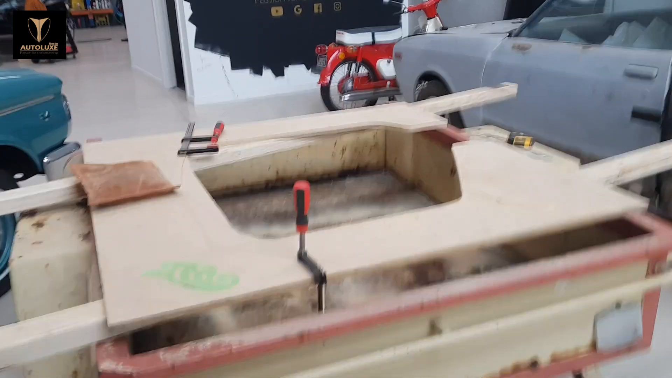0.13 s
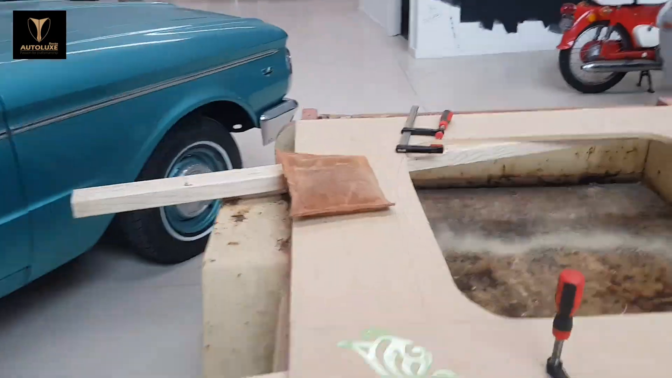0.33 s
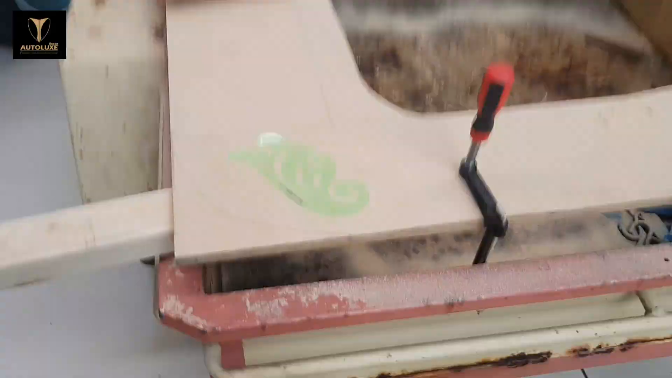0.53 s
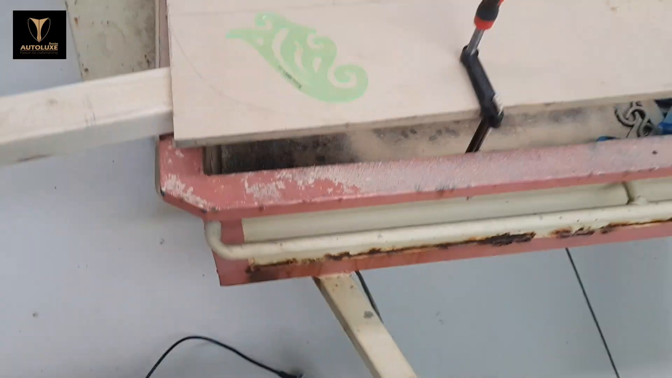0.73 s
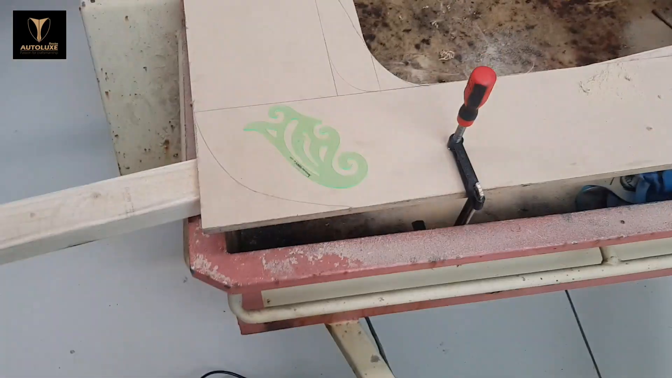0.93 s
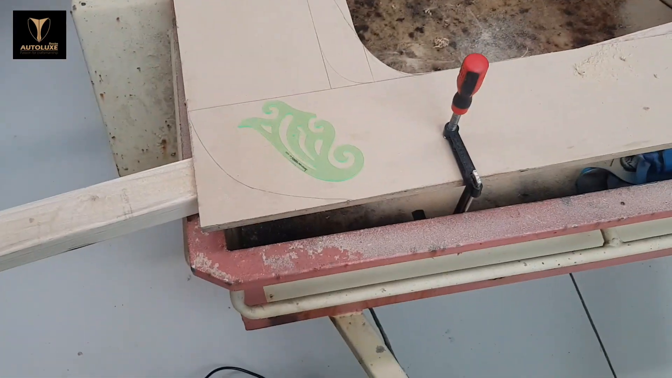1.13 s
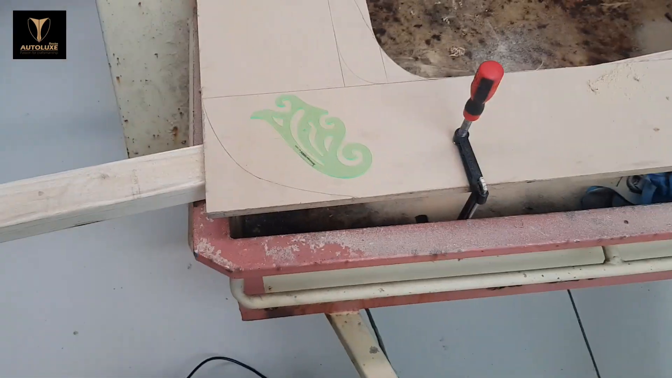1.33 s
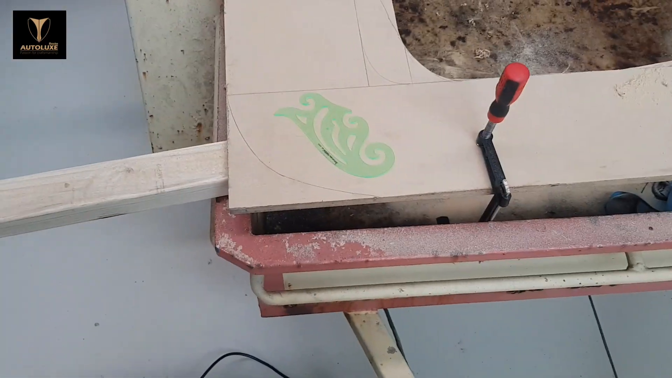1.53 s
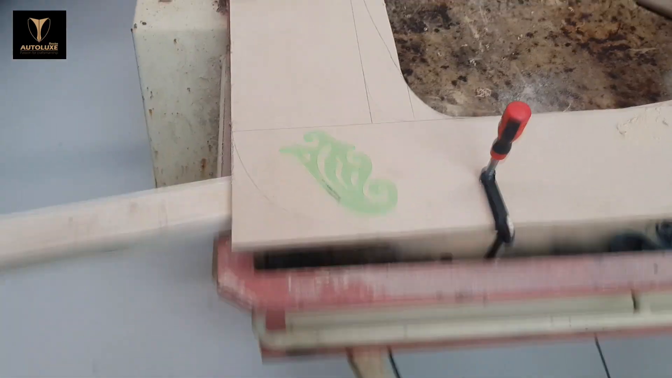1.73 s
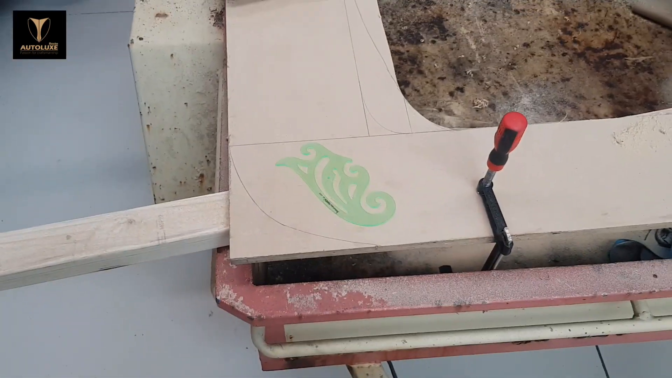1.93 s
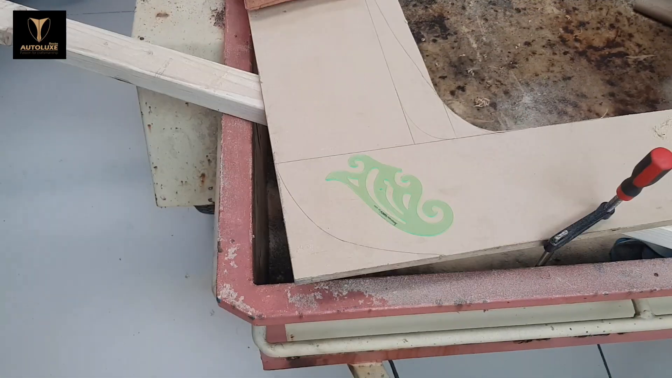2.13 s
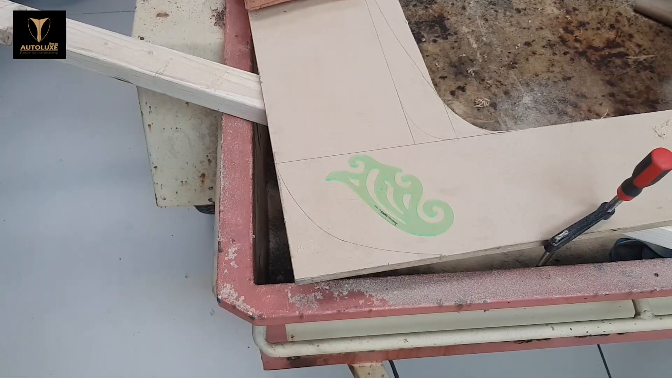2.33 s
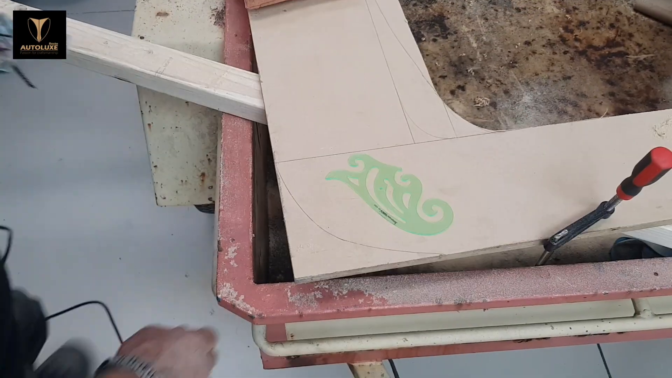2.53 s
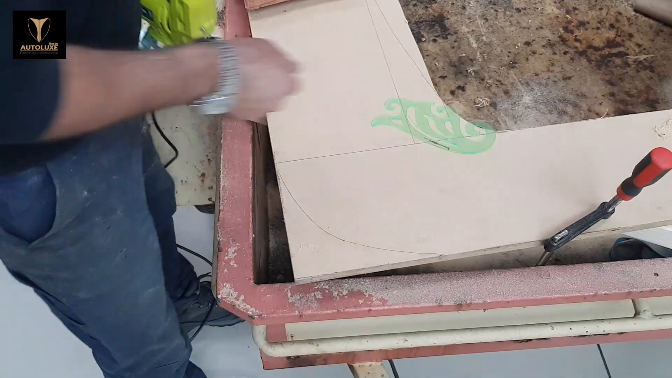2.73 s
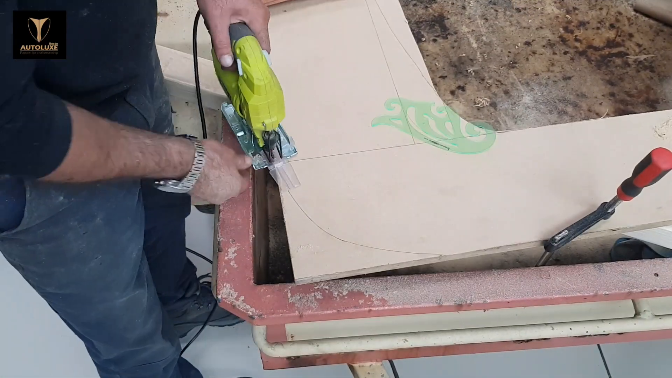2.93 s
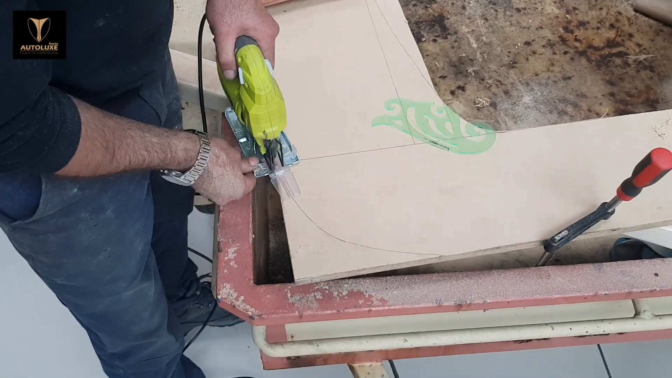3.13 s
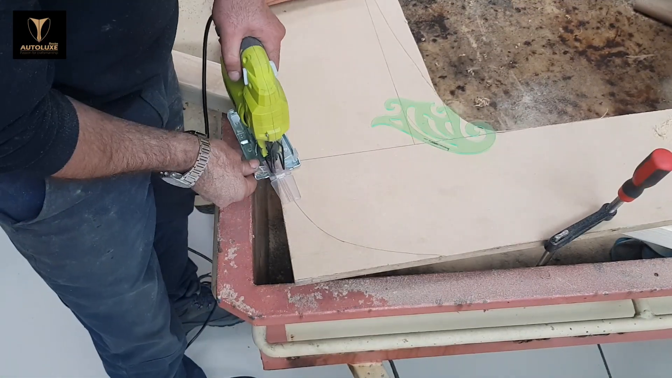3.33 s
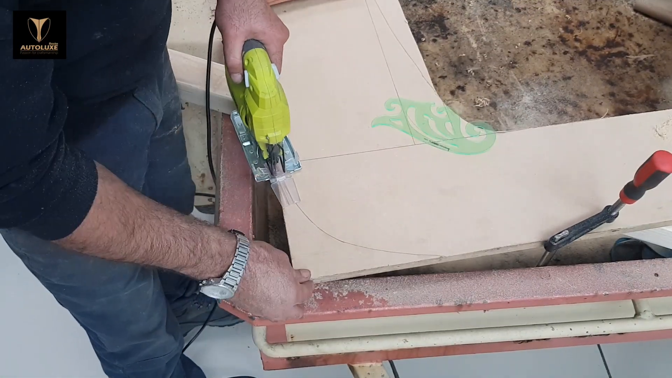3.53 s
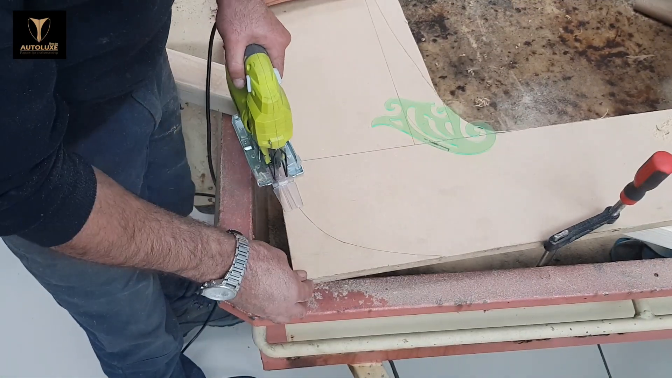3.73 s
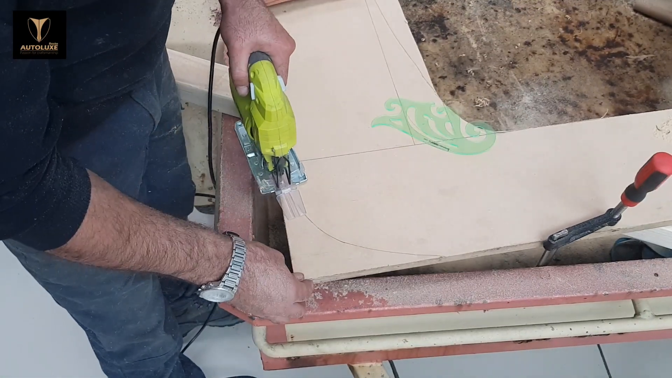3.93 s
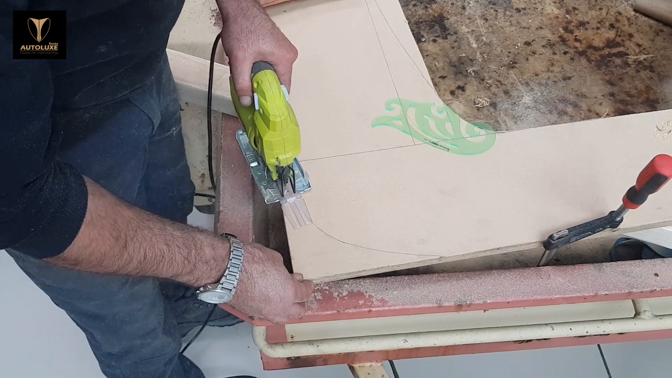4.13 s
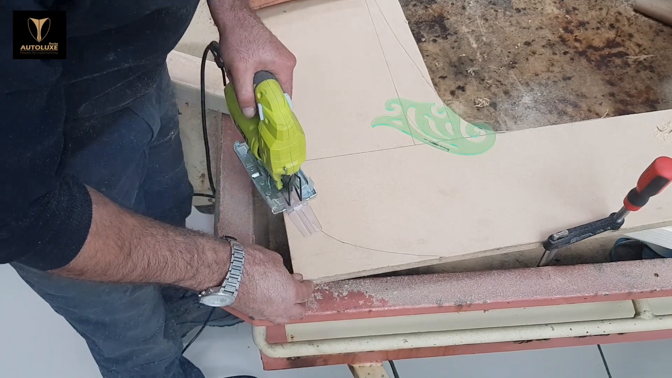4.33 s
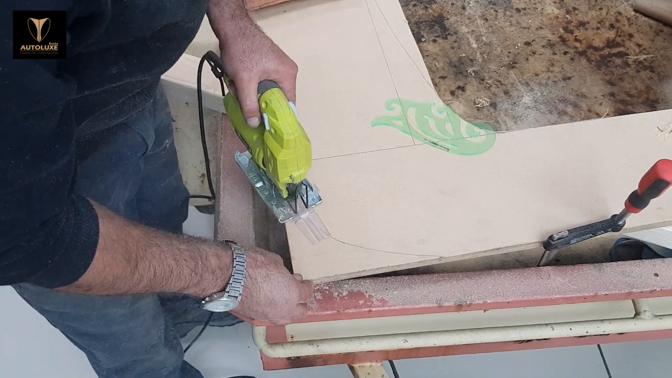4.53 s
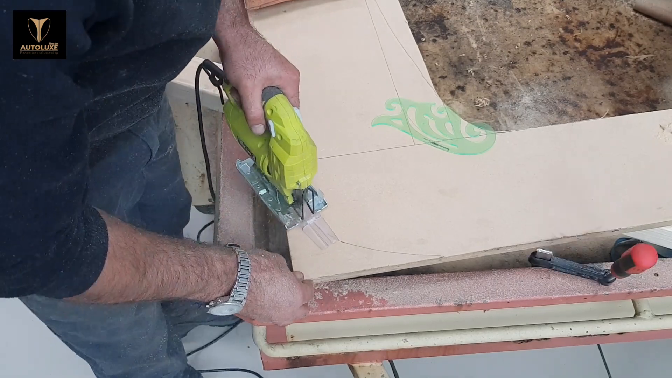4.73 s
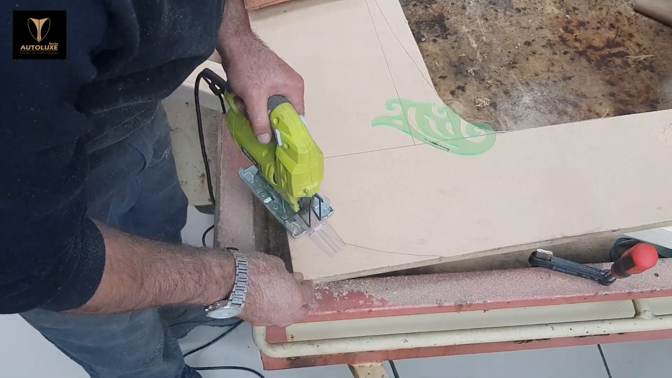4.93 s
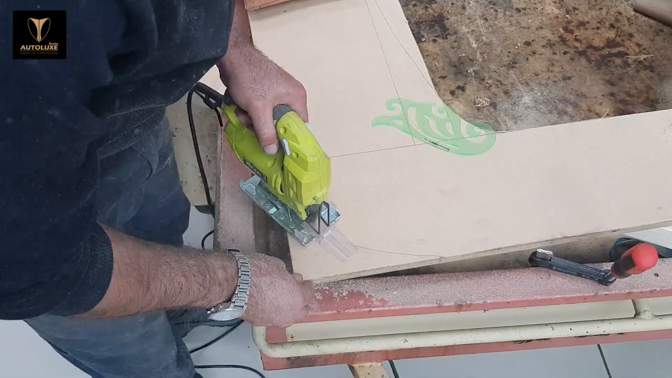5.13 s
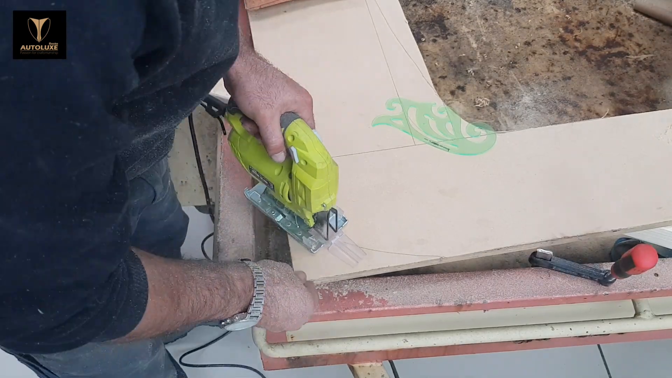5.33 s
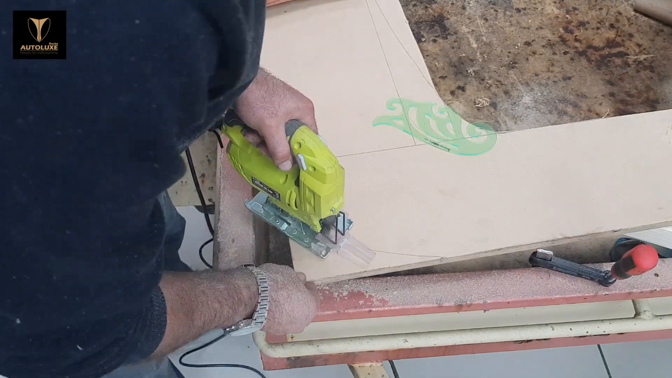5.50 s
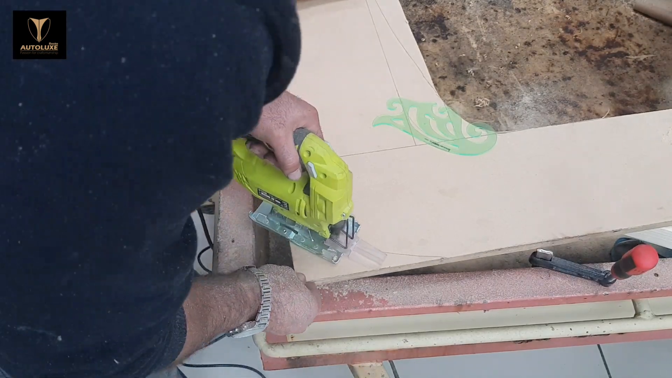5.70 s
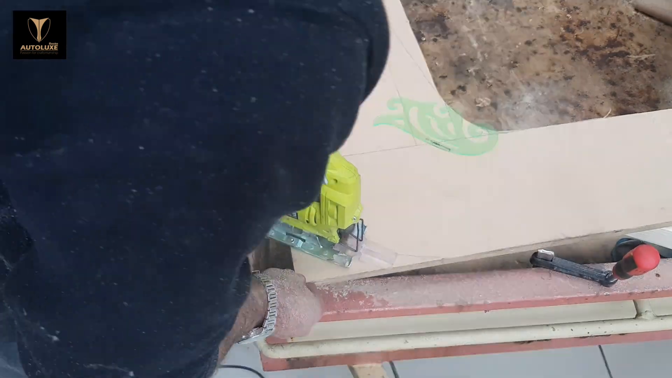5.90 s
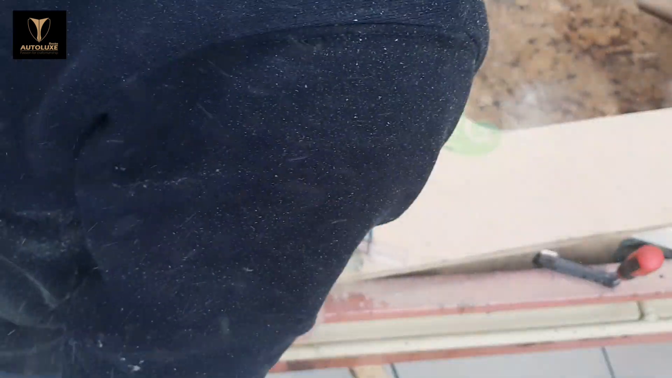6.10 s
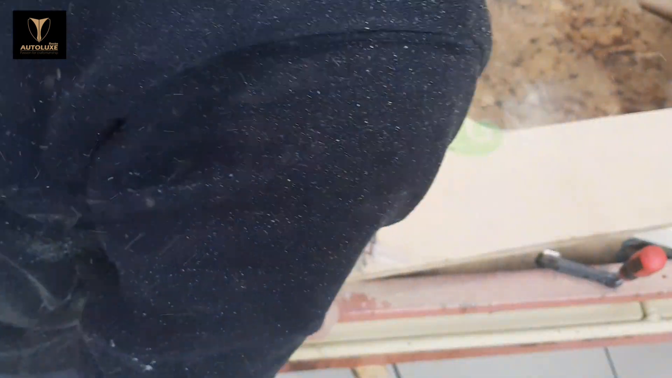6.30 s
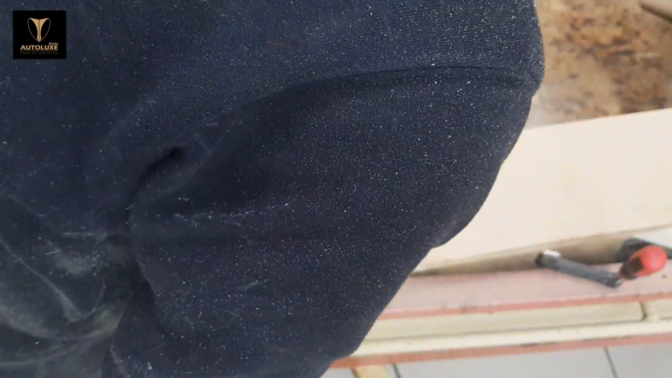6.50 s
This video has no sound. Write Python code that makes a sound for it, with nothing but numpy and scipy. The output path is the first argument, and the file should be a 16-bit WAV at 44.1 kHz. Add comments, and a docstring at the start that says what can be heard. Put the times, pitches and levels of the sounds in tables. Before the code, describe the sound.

Light wooden knocks, scrapes and shoe scuffs in a quiet workshop, then an electric jigsaw snaps on and buzzes harshly through a board.

```python
"""An electric jigsaw cuts a wooden board on a steel frame in a workshop, at about 52 strokes a second.
Its partials, set at multiples of the stroke rate, shake the board; noise pulsed by the stroke is the rasp.
Motor, gears and fan run on; pushed, the saw slows and the board sings; eased off, it speeds up.
Before the cut, knocks ring the board's decaying modes, and it shifts in friction noise as shoes scuff the
floor over low room noise. During the cut a clamp shakes loose and falls with thumps and a click."""
import sys
import numpy as np
from scipy import signal
from scipy.fft import rfft, irfft, next_fast_len
from scipy.io import wavfile
from scipy.ndimage import map_coordinates

SR = 44100
rng = np.random.default_rng(int(sys.argv[2]) if len(sys.argv) > 2 else 0)


def generate_wav(signal):
    """Clip the signal to [-1, 1] and save it as 16-bit WAV at the path in sys.argv[1]."""
    frames = np.transpose(np.atleast_2d(signal))
    scaled = np.clip(frames, -1, 1) * 32767
    pcm = np.round(scaled).astype(np.int16)
    wavfile.write(sys.argv[1], SR, pcm)


N = 289296
SAW_ON = 3.092  # s

# coherence of the left and right sound: (frequency [Hz], likeness [-1 to 1])
LIKENESS = [(30, 0.31), (100, 0.99), (300, 0.91), (600, 0.76), (1000, 0.59), (2000, 0.41), (4000, 0.24),
            (8000, 0.53), (14000, 0.064)]
# the board jumps as the saw starts, as a clamp shakes loose and falls, and as the blade bites again:
# (time [s], relative level [dB])
JOLTS = [(3.092, -32), (4.662, -28), (4.673, -25), (4.679, -18), (4.693, -26), (4.715, -32), (6.345, -36),
         (6.359, -28), (6.378, -33)]


def amp(db):
    """Converts a level in decibels to an amplitude ratio."""
    return 10 ** (np.asarray(db) / 20)


def unit(x):
    """Normalises the root mean square to 1."""
    return x / np.sqrt(np.mean(x ** 2) + 1e-20)


def clock():
    """Sampling instants in seconds."""
    return np.arange(N) / SR


def along(points, hz):
    """Interpolates (frequency [Hz], value) points on a logarithmic frequency axis."""
    f, v = np.transpose(points)
    return np.interp(np.log(hz + 1), np.log(f + 1), v)


def curves(rows):
    """Linear interpolation in time: one value per sample for each column after the time."""
    s, *cols = np.transpose(rows)
    return [np.interp(clock(), s, c) for c in cols]


def wobble(rate):
    """A smooth random modulation: a spline through Gaussian knots, rate of them a second."""
    knots = rng.standard_normal(int(N * rate / SR) + 4)
    coarse = np.arange(0, N + 32, 32)
    smooth = map_coordinates(knots, [coarse * rate / SR])
    return np.interp(np.arange(N), coarse, smooth)


def filtered(x, response):
    """Linear filtering: the spectrum times a response given as a function of frequency."""
    m = next_fast_len(N + SR // 4)
    hz = np.fft.rfftfreq(m, 1 / SR)
    return irfft(rfft(x, m) * response(hz), m)[..., :N]


def rush(spectrum, drive=1, alike=LIKENESS):
    """Broadband stereo noise of rms 1, pulsed by drive, then coloured; mid and side set its coherence."""
    def colour(hz):
        turn = np.arccos(np.clip(along(alike, hz), -1, 1)) / 2
        return amp(along(spectrum, hz)) * [np.cos(turn), np.sin(turn)]
    mid, side = filtered(drive * rng.standard_normal((2, N)), colour)
    return unit(np.array([mid + side, mid - side]))


def line(turns, hz, waver_db, smear):
    """A sinusoidal partial with wavering level and phase; its left-right phase follows the likeness."""
    phase = 2 * np.pi * (turns + rng.random()) + smear * wobble(22)
    apart = np.arccos(np.clip(along(LIKENESS, hz), -1, 1)) / 2 * wobble(2.045)
    level = amp(waver_db * wobble(4.14))
    return unit(level * np.sin(np.float32([phase + apart, phase - apart])))


def add(track, s, sound):
    """Superposition: mixes a sound into a track at time s."""
    part = track[..., round(s * SR):][..., :sound.shape[-1]]
    part += sound[..., :part.shape[-1]]


def impulses(times, sizes):
    """A train of weighted impulses, each at the sample of its time in seconds."""
    return np.bincount(np.clip(times * SR, 0, N - 1).astype(int), sizes, N)


def bursts(times, sizes, life):
    """Sharp onsets with exponential decay: their energies add, and each amplitude falls to 1/e in life s."""
    hits = impulses(times, sizes ** 2)
    energy = signal.lfilter([1], [1, -np.exp(-2 / (life * SR))], hits)
    return unit(np.sqrt(energy))


def swell(start, length, rise, fall):
    """Exponential rise up to the start, hold, then decay; rise and fall are the seconds for 20 dB."""
    t = clock() - start
    rising, falling = (t / rise), (length - t) / fall
    return amp(20 * np.clip(np.minimum(rising, falling), -6, 0))


def dying(rows, t60):
    """Sudden onsets with exponential decay, one for each (time [s], level [dB]) row."""
    hits, t = np.zeros(N), np.arange(SR // 2) / SR
    for s, db in rows:
        add(hits, s, amp(db - 60 * t / t60))
    return hits


def bounced(pair, drift=0.062):
    """Comb filtering by near surfaces; the delays drift and differ between left and right."""
    # off the board, the frame and the worker: (nominal delay [ms], level [dB])
    reflections = [(.9, -17), (2.3, -14), (3.7, -13), (5.9, -13)]
    n = np.arange(N)

    def echo(x, ms):
        stretch = 1 + .15 * rng.normal() + drift * wobble(2)
        return np.interp(n - ms * SR / 1000 * stretch, n, x)
    mixed = np.array([x + sum(amp(db) * echo(x, ms) for ms, db in reflections) for x in pair])
    return mixed * pair.std() / mixed.std()


def placed(pair, left_db, late_ms):
    """Stereo localisation: left_db makes the left louder, and late_ms delays the right."""
    right = map_coordinates(pair[1], [np.arange(N) - late_ms * SR / 1000], order=3)
    return np.array([pair[0] * amp(left_db / 2), right * amp(-left_db / 2)])


def background(whine_hz=2318, left_db=2):
    """Low coloured room noise, and a thin phase-modulated tone that comes and goes before the cut."""
    # spectrum of the room noise: (frequency [Hz], relative density [dB per Hz])
    room_tone = [(15, -49), (25, -21.5), (86, -6), (110, -13), (211, -16.5), (248, -16), (403, -26.5),
                 (791, -28.5), (857, -30.5), (955, -32), (1390, -41.5), (7630, -58), (12000, -46),
                 (15800, -54)]
    # slow course of the noise: (time [s], relative level [dB])
    room_level = [(0.0, -66), (0.43, -65.5), (1.5, -70.5), (1.69, -67), (2.95, -62.5), (3.05, -64)]
    # coherence of the noise: (frequency [Hz], left-right likeness [-1 to 1])
    room_likeness = [(60, 0.94), (180, 0.96), (550, 0.41), (1650, -0.27), (4970, -0.47), (15000, 0.26)]
    # the faint tone: (start [s], length [s], level [dB])
    whines = [(2.33, 0.05, -78), (2.42, 0.05, -74.5), (2.535, 0.05, -73.5), (2.67, 0.035, -77),
              (2.812, 0.06, -76.5), (2.9, 0.025, -82), (2.985, 0.07, -80)]
    ramp = 0.04  # s to swell or to fade by 20 dB
    level_db, = curves(room_level)
    t = clock()
    sounding = np.max([amp(db) * swell(s, length, ramp, ramp) for s, length, db in whines], axis=0)
    whine = sounding * np.sqrt(2) * np.sin(2 * np.pi * whine_hz * t + wobble(22))
    noise = amp(level_db + 2.0) * rush(room_tone, alike=room_likeness)
    noise = noise * amp(-6 * (t > SAW_ON))  # the noise is 6 dB lower from the saw's start
    return (noise + whine) * amp([[left_db / 2], [-left_db / 2]])


def board_blow(modes, thud_db, wood_db, split_hz=270, attack=0.0011):
    """Modal ringing: decaying sinusoids with random detuning and strength, low and high modes set apart."""
    t = np.arange(SR // 4) / SR
    ring = np.zeros(len(t))
    for k, (hz, db, t60) in enumerate(modes):
        blow_db = thud_db if hz < split_hz else wood_db
        decay = amp(blow_db + db + rng.normal(0, 3.8) - 60 * t / t60)
        ring += decay * (-1) ** k * np.sin(2 * np.pi * hz * (1 + rng.normal(0, 0.048)) * t)
    return ring * (1 - np.exp(-t / attack))


def knocks(tick_t60=0.041):
    """Impact excitation: each contact rings the board's modes and gives a short noise tick."""
    # light knocks: (time [s], relative thud [dB], relative wood [dB], relative tick [dB])
    contacts = [(0.073, -69.5, -67, -68), (0.115, -63.5, -68, -68), (0.476, -48, -49, -65),
                (0.485, -56, -53.5, -58), (0.511, -49, -58, -76), (0.524, -54, -62, -66),
                (1.719, -49, -48.5, -62), (2.068, -54, -57, -74), (2.306, -66, -56, -74),
                (2.317, -52, -48.5, -70), (2.326, -81, -50, -62), (2.875, -49, -46.5, -62),
                (2.894, -51, -58, -77)]
    # modes of the free board: (nominal frequency [Hz], relative level [dB], t60 [s])
    board_modes = [(97.7, -2.5, 0.18), (147, 3, 0.056), (205, 0.5, 0.07), (269, -2.5, 0.038),
                   (360, 6, 0.04), (461, 3, 0.072), (590, -2.5, 0.053), (661, 2.5, 0.067),
                   (876, -2.5, 0.019)]
    wood, ticks, t = np.zeros(N), np.zeros(N), np.arange(SR // 4) / SR
    for s, thud_db, wood_db, tick_db in contacts:
        add(wood, s, board_blow(board_modes, thud_db + 3.0, wood_db - 1.5))
        add(ticks, s, amp(tick_db - 10.0 - 60 * t / tick_t60))
    return wood + ticks * rush([(300, -20), (900, 6), (2500, -23), (5000, 1), (9000, -6), (15000, -12)])


def sliding(rows, rise, fall, scrape, grit, rough_db, grains_per_s=420, grain_db=6, grain_life=0.0062):
    """Dry friction: dull scrape and grit catch grain by grain; ramps scale with the stroke's length."""
    shapes = np.array([swell(s, length, rise * length, fall * length) for s, length, _, _ in rows])
    levels = amp(np.array(rows)[:, 2:].T)
    scrape_gain, grit_gain = np.sqrt(levels ** 2 @ shapes ** 2)  # energies add
    chance = rng.random((int(grains_per_s * N / SR), 2))
    grains = bursts(chance[:, 0] * N / SR, amp(grain_db * chance[:, 1]), grain_life)
    catch = amp(rough_db * wobble(70)) * grains
    return scrape_gain * rush(scrape, catch) + grit_gain * rush(grit, catch)


def scuffs():
    """Friction noise of soles on the floor and wood on the frame, with a rustle of clothes."""
    # soles on the floor: (start [s], length [s], relative scrape [dB], relative grit [dB])
    steps = [(0.075, 0.06, -74, -76.5), (0.175, 0.029, -72, -74), (0.305, 0.017, -73, -69.5),
             (0.33, 0.027, -67, -78), (0.405, 0.051, -75, -68), (0.595, 0.023, -70, -68.5),
             (0.68, 0.071, -66, -75), (0.74, 0.089, -58, -67), (0.82, 0.038, -58.5, -66),
             (0.91, 0.026, -77, -64), (0.96, 0.038, -85, -73.5), (1.274, 0.013, -64, -61),
             (1.31, 0.021, -86, -75), (1.56, 0.016, -70, -80), (1.68, 0.032, -76, -72)]
    # the board on the frame: (start [s], length [s], relative scrape [dB], relative grit [dB])
    shifts = [(0.486, 0.0012, -43, -54), (1.72, 0.013, -66, -71), (2.068, 0.0075, -68, -86),
              (2.138, 0.013, -58, -61.5), (2.228, 0.008, -64, -62), (2.25, 0.0085, -56, -50),
              (2.31, 0.04, -57, -61), (2.455, 0.02, -58, -65.5), (2.618, 0.019, -57.5, -61.5),
              (2.67, 0.03, -64, -61.5), (2.879, 0.01, -56.5, -74)]
    # spectra of sole and wood, scrape and grit: (frequency [Hz], relative density [dB per Hz])
    sole, sole_grit = [(300, -6), (520, 2.5), (700, 5), (950, -5.5), (1280, -21), (1600, -8.5), (2000, -16),
                       (2780, -16), (3600, -32), (5000, -39)], [(2000, -2), (2800, -4.5), (3700, -8), (4300, -7), (5000, -7),
                                     (5700, -9.5), (6400, -10), (7300, -8), (8400, -2), (9500, -13),
                                     (12500, -9.5), (15800, -40)]
    wood_scrape, wood_grit = [(180, -30), (300, -3.5), (629, 2), (683, 3), (780, -1), (1600, -2.5),
                              (1780, -2.5), (3500, -20), (4550, -49), (7700, -120)], [(1180, -39), (2000, -1), (3270, -9.5), (4100, -10.5),
                                              (6260, -17.5), (8330, -12), (13600, -24), (15800, -24)]
    # brief bright swishes: (start [s], length [s], level [dB])
    swishes = [(0.17, 0.023, -78), (2.297, 0.03, -62), (2.67, 0.018, -64)]
    # their spectrum: (frequency [Hz], relative density [dB per Hz])
    sleeve_spectrum = [(5000, -30), (8000, -7), (10500, 0), (14500, -3), (15800, -5)]
    # rise and fall: time for 20 dB, in lengths of the stroke
    soles = sliding(steps, 0.97, 0.79, sole, sole_grit, rough_db=-0.5)
    wood = sliding(shifts, 1.64, 2.7, wood_scrape, wood_grit, rough_db=2.0)
    # a soft rustle while the board is moved
    moving = swell(2.06, 0.66, 0.03, 0.38) * amp(1.8 * wobble(24.6))
    rustle = moving * (amp(-72) * rush(wood_scrape) + amp(-84) * rush(wood_grit))
    swishing = sum(amp(db) * swell(s, length, 0.014, 0.036) for s, length, db in swishes)
    sleeve = swishing * rush(sleeve_spectrum)
    return bounced(amp(-2.5) * soles + amp(-2.0) * wood + rustle + sleeve)


def clicks():
    """Short decaying noise: hard points touch, the board's edge cracks free, and steps leave a ring."""
    # small sharp clicks, the last two from the saw's switch and the falling clamp:
    # (time [s], relative level [dB])
    taps = [(0.468, -64), (0.4888, -43), (0.561, -56), (1.4935, -66), (1.722, -44), (1.729, -45),
            (1.735, -54), (3.091, -36), (4.667, -36.5)]
    # the board's edge catches on the frame and cracks free: (time [s], onset level [dB])
    catches = [(0.486, -54), (1.72, -55), (2.069, -55), (2.139, -54), (2.146, -54), (2.246, -50),
               (2.251, -49), (2.257, -46), (2.263, -46), (2.328, -51), (2.336, -54), (2.616, -55),
               (2.623, -52), (2.631, -51), (2.877, -54)]
    # a bright ring lingers after the harder steps: (time [s], onset level [dB])
    after_rings = [(0.42, -69), (0.915, -62), (1.278, -71)]
    # spectra of crack and ring: (frequency [Hz], relative density [dB per Hz])
    crack, bright_ring = [(300, -11), (700, 10), (1500, 18), (2700, -10), (4000, -11), (9000, -22),
                          (15000, -23)], [(2000, -22), (2850, 2), (3500, -16), (4350, -3), (5100, -2),
                                         (5600, -25), (9000, -40)]
    tap_noise = rush([(800, -27), (2500, -4), (6000, -11), (12000, 7), (15800, -10.0)])
    points = amp(-6.5) * dying(taps, t60=0.015) * tap_noise
    cracks = dying(catches, t60=0.018) * rush(crack)
    return points + cracks + dying(after_rings, t60=0.23) * rush(bright_ring)


def clonks():
    """Modal ringing of a hollow, harder contact: a quick chatter excites a few pitched modes."""
    # the chatter: (time [s], relative level [dB])
    chatter = [(1.274, -42), (1.278, -41.5), (1.286, -58)]
    # the hollow modes: (frequency [Hz], relative level [dB], t60 [s])
    hollow = [(482, 0.5, 0.042), (595, 0.5, 0.053), (1680, -11, 0.025), (2590, -15.5, 0.043),
              (2924, -28, .06), (3310, -15, 0.04), (4200, -23, 0.05), (4760, -30, 0.05), (6700, -26, 0.035),
              (8300, -22, 0.066)]
    track, t = np.zeros(N), np.arange(SR // 4) / SR
    for s, db in chatter:
        ring = np.zeros(len(t))
        for hz, level, t60 in hollow:
            decay = amp(db + level + rng.normal(0, 1.6) - 60 * t / t60)
            ring += decay * np.sin(2 * np.pi * (hz * t + rng.random()))
        add(track, s, ring * (1 - np.exp(-t / 0.0024)))
    return track


def hall(x):
    """Diffuse reverberation: convolution with noise that decays at a rate set by frequency."""
    # the workshop's reverberation: (frequency [Hz], t60 [s])
    reverberation = [(150, 0.23), (1000, 0.24), (5000, 0.42), (14000, 0.099)]
    hz, t, z = signal.stft(rng.standard_normal((2, SR // 2)), SR, nperseg=256)
    decay = amp(-60 * t / along(reverberation, hz)[:, None])
    tail = signal.istft(z * decay, SR, nperseg=256)[1]
    return signal.fftconvolve(x, tail / np.linalg.norm(tail[0]), axes=1)[:, :N]


def depth():
    """Blade position for cross-fading: 0 at the edge, 1 once it has turned into the board."""
    return np.interp(clock(), [4.1, 5.2], [0, 1])


def jolts(attack=0.0018):
    """Damped modes: held down by the saw, the board gives dull thumps and sheds no deep bass."""
    # the board under the saw's shoe: (nominal frequency [Hz], relative level [dB], t60 [s])
    pinned = [(160, -8, .07), (235, -3, .055), (315, 0, .07), (430, 0, .03), (560, 1, .028)]
    track, t = np.zeros(N), np.arange(SR // 4) / SR
    for s, db in JOLTS:
        thump = np.zeros(len(t))
        for hz, level, t60 in pinned:
            decay = amp(db + level + rng.normal(0, 1) - 60 * t / t60)
            thump += decay * np.sin(2 * np.pi * hz * (1 + rng.normal(0, .03)) * t)
        add(track, s, thump * (1 - np.exp(-t / attack)))
    return filtered(track, lambda hz: (1j * hz / (1j * hz + 90)) ** 2)  # high-pass at 90 Hz


def drone(strokes, rate, usual_bite_db=-41.0):
    """Forced vibration: partials locked to the stroke; the motor turns 46 times for every 5 strokes."""
    # shaking: (multiple of the stroke rate, relative level at the edge [dB], same deep in the board [dB])
    stroke_orders = [(2, -54.5, -54.5), (4, -57, -66), (6, -58, -59), (8, -54.5, -59), (9, -50, -54),
                     (11, -52, -52), (12, -59, -61), (13, -51, -54), (14, -54, -62), (15, -53, -53.5),
                     (16, -57, -58), (17, -48, -52.5), (19, -58, -51.5), (20, -55.5, -63), (21, -57, -66),
                     (23, -55, -51), (25, -62, -56.5), (29, -58, -61), (34, -53.5, -61), (46, -53.5, -53.5)]
    # the board's song in a push: (multiple of the stroke rate, relative level at the edge [dB], deep [dB])
    singing = [(3, -50, -56), (5, -50.5, -49), (7, -40.5, -49)]
    # the saw is pushed into the wood; between pushes it runs free: (start [s], length [s])
    pushes = [(3.56, 2.6), (6.385, 0.3)]
    # how hard the teeth bite: (time [s], level [dB] relative to the usual bite's scale)
    bite = [(3.12, -41), (3.14, -36.5), (3.22, -44.5), (3.31, -41), (3.77, -44), (4.56, -42), (4.73, -45.5),
            (5.39, -41.5), (5.44, -46), (5.46, -43), (5.86, -41.5), (6.06, -40.5), (6.11, -42.5),
            (6.14, -41), (6.2, -45), (6.42, -40), (6.55, -42)]
    # the motor's hum as the saw turns along the curve: (time [s], relative level [dB])
    hum_level = [(3.2, -37.5), (3.31, -43), (3.71, -37.5), (4.15, -40.5), (4.27, -35.5), (5.24, -39.5),
                 (5.37, -45.5), (6.17, -40), (6.28, -45), (6.46, -37), (6.55, -39)]
    # side tones as each stroke loads the motor: (distance from the hum [stroke rates], relative level [dB])
    side_tones = [(-3, -13), (-2, -13), (-1, -10), (1, -16), (2, -15), (3, -16), (9, -16), (11, -17)]
    # gears running free: (multiple of the stroke rate, relative level [dB])
    free_orders = [(12, -51), (23, -49.5)]
    # with the blade hardly held, the overhang judders: (start [s], length [s], relative level [dB])
    judders = [(3.317, 0.067, -44), (3.49, 0.055, -44), (6.304, 0.091, -44.5)]
    # spectra of growl and flutter: (frequency [Hz], relative density [dB per Hz])
    body, flutter_spectrum = [(150, -16), (270, 7), (400, -3), (560, 10.5), (700, 10), (880, 3),
                              (1100, -18), (1500, -41)], [(30, -32), (60, -24), (100, 2), (140, -3.5), (220, -1),
                                            (330, -4), (500, -33), (900, -52)]
    motor_db, = curves(hum_level)
    bite_db, = curves(bite)
    gearing, third, mean = 46 / 5, 3, rate.mean()
    deep = depth()

    def orders(rows, waver_db, smear):
        partials = 0
        for k, edge, inside in rows:
            level = amp(edge + deep * (inside - edge))
            partials = partials + level * line(round(k) * strokes, k * mean, waver_db, smear(k))
        return partials

    # a biting blade shakes the board harder, at every multiple of the stroke
    load_db = 1.22 * (bite_db - usual_bite_db) + np.interp(clock(), [3.1, 3.25], [-7, 0])
    shake = orders(stroke_orders, waver_db=2.4, smear=lambda k: 0.0004 * k * k)
    # the board sings only while the teeth hold it: 20 dB in 0.15 s to take hold, 0.07 s to come free
    grip = np.max([swell(s, length, 0.15, 0.07) for s, length in pushes], axis=0)
    board = grip * amp(0.56 * load_db) * orders(singing, waver_db=1, smear=lambda k: 0.05)
    # running free, the saw shakes the overhang at its third multiple
    ramp = 0.085  # s to swell or to fade by 20 dB
    loose = sum(amp(db) * swell(s, length, ramp, ramp) for s, length, db in judders)
    overhang = loose * line(third * strokes, third * mean, waver_db=1.5, smear=0.4)
    hum = sum(amp(db) * line((gearing + k) * strokes, gearing * mean, waver_db=.7, smear=.08)
              for k, db in [(0, 0)] + side_tones)
    gears = (1 - grip) * sum(amp(db) * line(k * strokes, k * mean, waver_db=2, smear=.3)
                             for k, db in free_orders)
    # a short squeal at the 46th multiple as the saw eases off
    squeal = amp(-47) * swell(6.28, .08, .1, .1) * line(46 * strokes, 46 * mean, waver_db=1, smear=.6)
    motor_start = amp(np.interp(clock(), [3.13, 3.2], [-15, 0]))
    motor = motor_start * (amp(motor_db - 5) * hum + gears + squeal)
    # tearing fibres growl in the board on each upstroke and downstroke
    growl = amp(-49.0 + 3.4 * load_db) * rush(body, np.exp(-3 * (2 * strokes % 1)))
    # the board flutters under the shoe, more after each jolt
    flutter = amp(-55.5) + sum(amp(db - 33) * swell(s, 0, 0.02, 0.055) for s, db in JOLTS)
    uneven = unit(amp(1.2 * wobble(2 * 52)))  # no two strokes are equally hard
    # the stroke's multiples are weaker while the teeth run free
    shake = amp(load_db - 7 * (0.5 - grip)) * shake
    return uneven * (shake + board + overhang + motor) + growl + flutter * rush(flutter_spectrum)


def cutting(strokes, chip_share=0.03, chip_life=0.0009, chips_per_s=300):
    """Modulated noise: clacks of the drive and snapping fibres pulse the teeth's rasp and the fan's air."""
    # the cut: (time [s], relative blade rasp [dB], relative air hiss [dB])
    cut = [(3.12, -39, -42.5), (3.95, -38.5, -43), (4.66, -38.5, -42.5), (4.72, -39.5, -44),
           (5.17, -39, -42.5), (6.34, -39, -46), (6.53, -39, -47.5)]
    # the blade reverses and the drive takes up its play: (place in the stroke [0-1], relative level [dB])
    reversals = [(0, 0), (.28, -3), (.5, -1), (.78, -3)]
    # the blade's flank rubs in the curve: (time [s], level [dB])
    binding = [(4.9, -49), (5.3, -41.5), (5.6, -40.5), (5.85, -42), (6.2, -58)]
    # spectra, with the blade at the edge, then deep in the board or swung round; rubbing flank;
    # teeth grazing the edge: (frequency [Hz], relative density [dB per Hz])
    rasp_entering, rasp_deep = [(150, -36), (260, -9), (480, -2.5), (800, -4.5), (1300, 0), (1700, -1),
                                (2300, 0.5), (3000, -4), (4200, -4), (5200, -6), (6200, -6.5), (7200, -13),
                                (9000, -36)], [(150, -50), (260, -10), (480, -2), (800, -4),
                                                       (1300, 3), (1800, 0), (2300, 2), (3000, -1),
                                                       (4200, -2.5), (5200, -5.5), (6200, -4),
                                                       (7200, -13.5), (9000, -29)]
    air_entering, air_deep = [(3820, -39), (6500, -29), (6920, -6.5), (8100, 4.5), (8950, 0.5), (9710, 3),
                              (11400, -2), (12400, -2), (13500, -8), (15100, -6.5), (15800, -21)], [(3820, -42), (6500, -22), (7240, -10), (8250, 0.5),
                                                    (9050, -7.5), (10300, -5), (12000, -9), (15100, -17.5),
                                                    (15800, -19)]
    flank, sizzle_spectrum = [(2400, -30), (3300, 0), (4100, -0.5), (5000, -5), (6500, -16.5)], [(8600, -27), (9500, -2), (9900, 0), (10500, -9), (11400, -18),
                                             (12400, -5), (13500, -25)]
    rasp_db, air_db = curves(cut)
    binding_db, = curves(binding)
    t, whole, deep = clock(), np.arange(int(strokes[-1]) - 1), depth()
    place, db = np.transpose(reversals)
    turns = whole[:, None] + place + rng.normal(0, .012, (len(whole), len(place)))
    when = np.interp(turns, strokes, t)
    clacks = bursts(when.ravel(), amp(db + rng.normal(0, 2, when.shape)).ravel(), .0028)
    chance = rng.random((int(chips_per_s * t[-1]), 2))
    chips = bursts(chance[:, 0] * t[-1], amp(18.0 * chance[:, 1] ** 2), chip_life)

    def drive(clack, chip):
        # shares of the energy; the rest is steady
        return np.sqrt(max(1 - clack - chip, 0) + clack * clacks ** 2 + chip * chips ** 2)

    def blend(early, late, pulse):
        # the colour shifts as the saw enters the board and turns along the curve
        return np.sqrt(1 - deep) * rush(early, pulse) + np.sqrt(deep) * rush(late, pulse)

    # over half of the rasp comes in clacks; the rush of air is steadier
    teeth, vents = drive(.6, chip_share), drive(.3, 0.17)
    rasp = amp(rasp_db + 3.5 + 0.14 * wobble(40)) * blend(rasp_entering, rasp_deep, teeth)
    air = amp(air_db + 4.0 + 0.24 * wobble(40)) * blend(air_entering, air_deep, vents)
    # the teeth first graze the edge
    sizzle = amp(-46) * swell(3.15, 0.17, 0.18, 1.1) * rush(sizzle_spectrum, vents)
    return bounced(rasp + air + sizzle + amp(binding_db) * rush(flank, teeth))


def slaps(strokes, late_s=0.00008, scatter_db=1.5):
    """Repeated impact through resonances: the shoe slaps the board once a stroke, never quite alike."""
    # the slaps: (time [s], level [dB])
    slap_level = [(3.12, -47.5), (3.7, -60), (4.1, -53), (4.28, -42), (4.58, -42.5), (4.75, -45),
                  (5.3, -48), (6.0, -54), (6.15, -40.5), (6.19, -64.5), (6.33, -49), (6.41, -46.5),
                  (6.55, -44)]
    # resonances of the slapped board: (frequency [Hz], width [Hz], relative level [dB])
    slapped = [(317, 30, -8.5), (576, 93, 1), (737, 100, 3), (840, 94, 3), (1020, 61, -3), (1340, 180, -13),
               (1630, 290, -10.5)]
    slap_db, = curves(slap_level)
    whole = np.arange(1, int(strokes[-1]))
    chance = rng.standard_normal((len(whole), 2))
    when = np.interp(whole, strokes, clock()) + late_s * chance[:, 0]
    blows = impulses(when, amp(scatter_db * chance[:, 1]))

    def wood(f):
        return sum((-1) ** k * amp(db) * 1j * f * w / (hz * hz - f * f + 1j * f * w)
                   for k, (hz, w, db) in enumerate(slapped))
    return amp(slap_db) * unit(filtered(blows, wood))


def jigsaw():
    """A reciprocating machine: one stroke phase drives its tones, rasp and slaps; jolts are added."""
    # mean course of the speed: (time [s], blade strokes per second [Hz])
    speed = [(3.12, 50.0), (3.16, 49.8), (3.22, 52.5), (3.29, 53.8), (3.46, 53.8), (4.04, 51.0),
             (4.67, 51.2), (4.7, 51.9), (5.09, 50.7), (5.2, 51.5), (5.34, 51.2), (5.54, 51.9), (5.73, 51.6),
             (6.14, 52.05), (6.25, 55.0), (6.3, 55.5), (6.41, 51.8), (6.55, 51.1)]
    # where the saw stands: (time [s], left louder by [dB], right late by [ms])
    position = [(3.1, 1.4, 0.08), (4.4, 1.5, 0.058), (5.3, 1, 0.037), (5.8, -0.6, 0.033),
                (6.4, -0.5, -0.023)]
    rate, = curves(speed)
    # the speed wanders by 0.05 strokes per second, the phase by 0.0015 of a stroke
    strokes = np.cumsum(rate + 0.05 * wobble(14)) / SR + 0.0015 * wobble(52)
    running = amp(np.minimum((clock() - SAW_ON) * 1700, 0))  # swells at 1700 dB/s up to the start
    sound = drone(strokes, rate) + cutting(strokes) + slaps(strokes) + jolts()
    return placed(running * sound, *curves(position))


def scene():
    """Superposition: handling noises a little to the left, with reverberation, room noise and the saw."""
    handling = placed(knocks() + clonks() + clicks() + scuffs(), left_db=2.0, late_ms=0.037)
    return handling + amp(-13.0) * hall(handling) + background() + jigsaw()


def record(dry):
    """Gating and band limiting: the sound drops out for a moment, and nothing stays above 15850 Hz."""
    live = np.interp(clock(), [2.012, 2.018, 2.055, 2.063], [1, 0, 0, 1])
    return filtered(dry * live, lambda hz: hz < 15850)


dry = scene()
out = record(dry)
generate_wav(out)
```